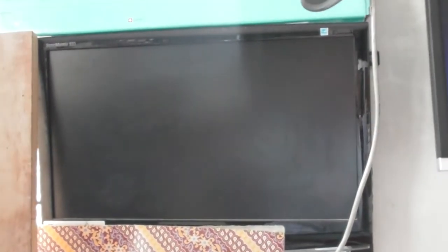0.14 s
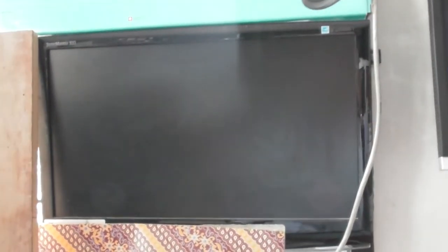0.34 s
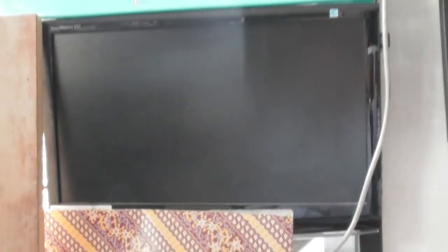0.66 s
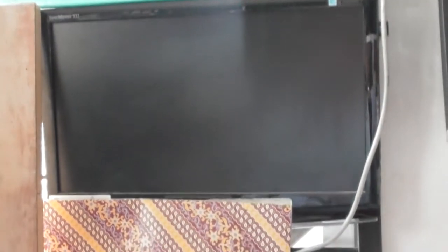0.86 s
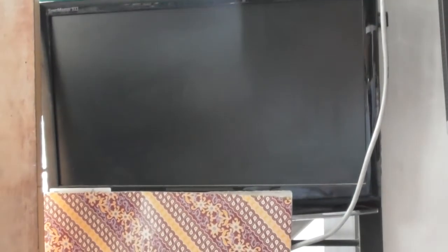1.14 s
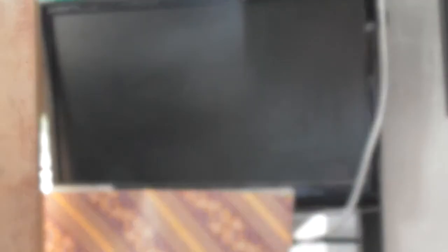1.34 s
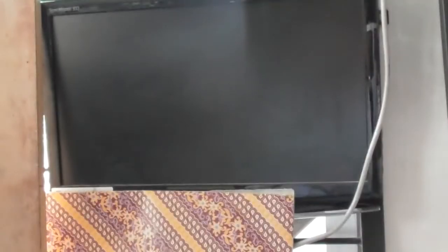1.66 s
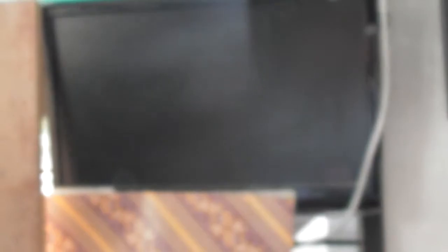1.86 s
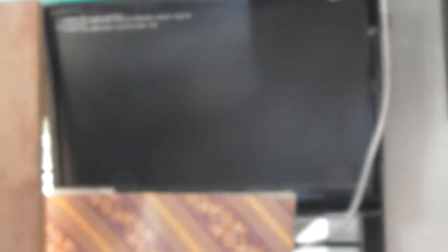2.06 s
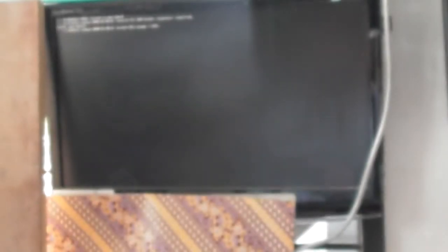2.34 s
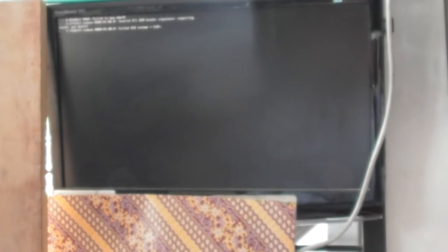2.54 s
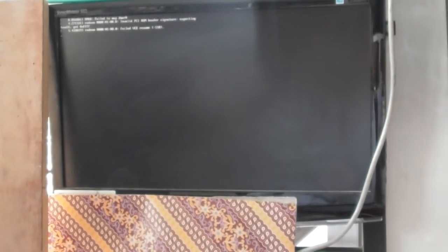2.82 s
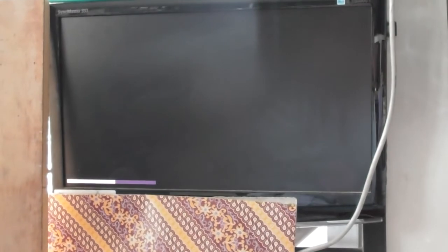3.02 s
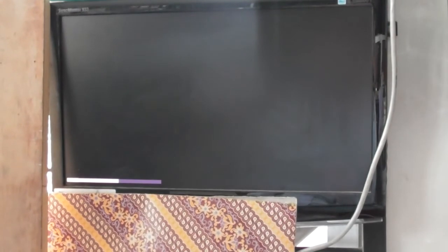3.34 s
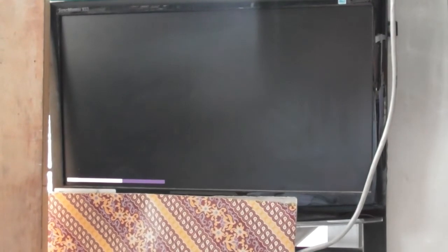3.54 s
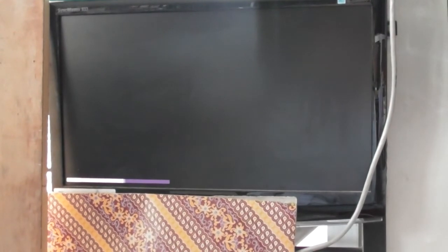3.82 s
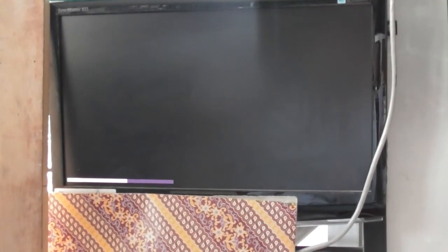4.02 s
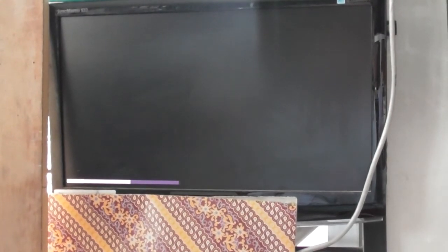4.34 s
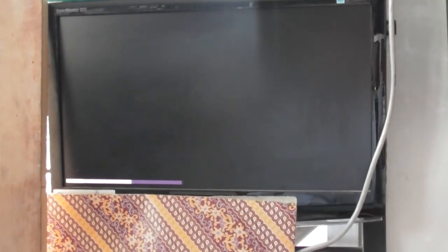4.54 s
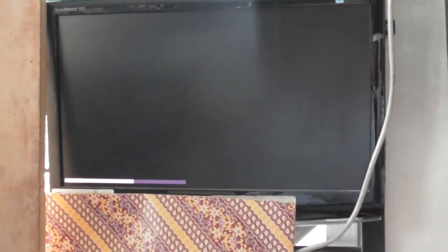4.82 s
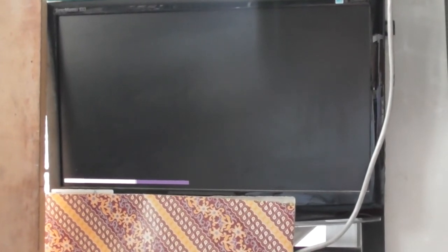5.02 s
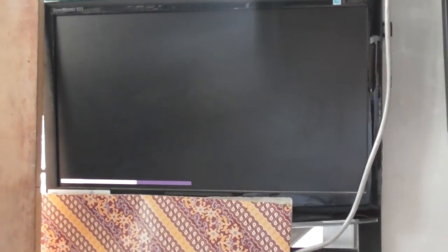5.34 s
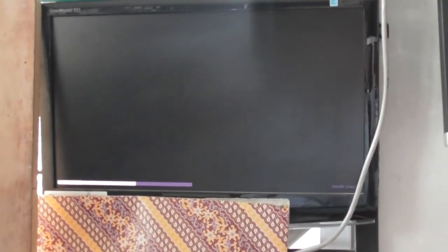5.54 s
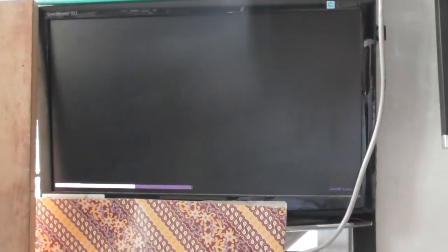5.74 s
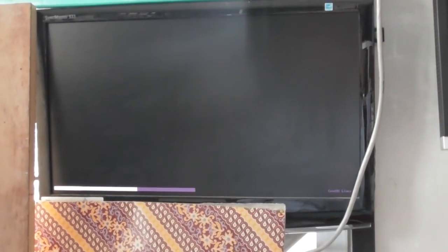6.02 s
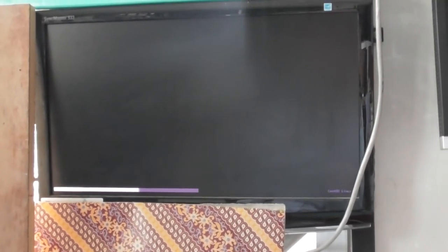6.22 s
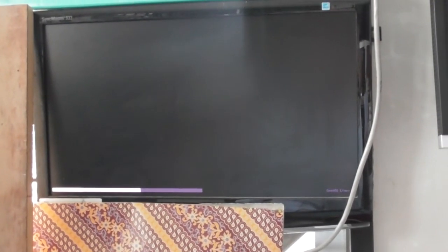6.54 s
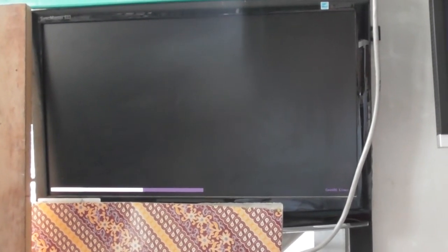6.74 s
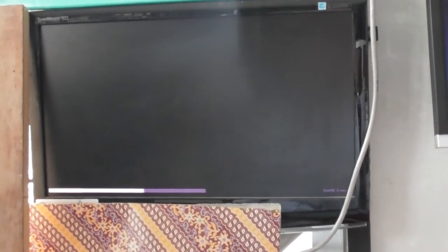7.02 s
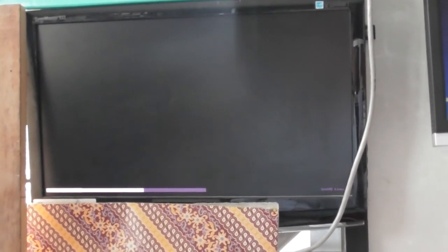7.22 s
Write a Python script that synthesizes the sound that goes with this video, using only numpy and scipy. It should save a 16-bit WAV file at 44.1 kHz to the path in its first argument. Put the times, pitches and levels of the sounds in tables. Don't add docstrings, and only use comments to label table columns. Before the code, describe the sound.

From 0 to about 7.4 seconds a desktop computer runs steadily in a small room: soft low rumble, a mid-range rush of fan air, a low hum near 107 hertz that dips now and then, and weaker blade and electrical tones. Outside, muffled by the wall, a small motorbike pulls away; its throaty buzz rises in pitch from 0 to about 2.4 seconds, swelling unevenly, then drops through a gear change until about 3.6. It pulls again more gently, fluttering with reflections around 4 to 5 seconds, recedes around 5 to 6.5, then returns as a brief deep swell near 7. Handling of the phone makes a barely audible tick at 0.15, a dry tick and dull knock near 5.0 and 5.1, a soft tick at 6.9, and a heavier close pair at 7.36. Faint microphone hiss lies underneath, slightly brighter near 0.4.

```python
import sys
import numpy as np
from scipy import signal
from scipy.fft import rfft, irfft, next_fast_len
from scipy.io import wavfile

SR = 44100
rng = np.random.default_rng(int(sys.argv[2]) if len(sys.argv) > 2 else 0)


def amplitude_ratio(level_db):
    exponent = np.asarray(level_db, float) / 20
    return 10 ** exponent


def transcribe(signal):
    frames = np.atleast_2d(signal).T
    limited = np.clip(frames, -1, 1)
    pcm = np.round(limited * 32767).astype(np.int16)
    wavfile.write(sys.argv[1], SR, pcm)


N = 325502


def fan_air(near_db):
    # (frequency [Hz], density [dB per Hz])
    rumble = [(20, -21), (40, -15.5), (53, -7.5), (64, -11.5), (90, -4.5), (115, -3), (140, -1), (180, -3),
              (225, -4), (260, -8.5), (290, -9), (400, -13), (520, -18), (700, -31)]
    rush = [(260, -16.5), (450, -5.5), (556, -2.5), (673, -0.5), (920, -6), (997, -5), (1140, -8),
            (1300, -8.5), (1460, -12.5), (3240, -17.5), (5000, -30), (6500, -69), (11000, -120)]
    low = air(rumble, -35 + 0.28 * near_db, flutter_db=0.93)
    high = air(rush, -44 + near_db, flutter_db=0.24)
    return low + high


def rotor_hum():
    # (time [s], depth [dB])
    rotor_nulls = [
        (.35, 0.5),
        (1.1, 4),
        (3.5, 3),
        (4.95, 6),
        (5.3, 7),
        (5.82, 4),
        (6.35, 9),
    ]
    null_length_s = 0.084
    level_db = -38.5 + 0.75 * drift(4.7)
    for s, depth_db in rotor_nulls:
        level_db = level_db - depth_db * bump(s, null_length_s)
    return tone(106.6, level_db, wander_hz=0.042, lean_db=1.4)


def blade_tones():
    # (time [s], level [dB])
    blade_path = [
        (0, -56),
        (.18, -47.5),
        (2.3, -50.5),
        (2.8, -53.5),
        (3.6, -53),
        (4.4, -50),
        (5.9, -49),
        (7.38, -57.5),
    ]
    # (frequency [Hz], level over the path [dB], pitch wander [Hz])
    blade_partials = [(342.3, -.5, .6), (674.6, -6.5, 1.2)]
    path_db, = in_time(blade_path)
    out = 0
    for hz, partial_db, wander_hz in blade_partials:
        level_db = path_db + partial_db + 1.8 * drift(5.1)
        out = out + tone(hz, level_db, wander_hz, lean_db=-1.0)
    return out


def steady_tones():
    # (frequency [Hz], rms level [dB], pitch wander [Hz], level wander [dB], left minus right [dB])
    steady_lines = [(99.9, -54, .05, 1, 0), (70.5, -55, .4, 2, 0), (994.5, -66, 4, 4, -1),
                    (1217, -68, 2, 3, -1), (1340, -69, 3, 4, -1), (2397, -77, 3, 3, 0),
                    (7246, -90, 4, 3, 0), (3531, -82, 2, 3, 0), (13404, -94, 1.5, 3, 0)]
    out = 0
    for hz, level_db, wander_hz, swing_db, lean_db in steady_lines:
        out = out + tone(hz, level_db + swing_db * drift(1.5), wander_hz, lean_db)
    return out


def motorbike():
    # (time [s], firing rate [1/s])
    speed = [(0, 42.7), (.56, 48.7), (1.12, 53.9), (1.54, 59.4), (1.82, 63.8), (2.1, 67.4), (2.36, 69.6),
             (2.6, 64.8), (2.94, 56.1), (3.1, 51.3), (3.36, 48.4), (3.64, 47.4), (4.2, 50.8), (4.76, 52.4),
             (5.88, 54.7), (6.72, 51.7), (7.0, 50.7), (7.38, 48.9)]
    # (time [s], exhaust level [dB], loss per higher order [dB])
    engine_load = [(0, -46, 0.1), (.15, -37.5, 0), (.45, -43.5, -2), (1.0, -32.5, 0.6), (1.4, -41, 1.5),
                   (1.6, -32.5, 2), (2.38, -32.5, 4), (2.55, -43, 4.5), (3.05, -35, 1.7), (3.6, -35.5, 0.3),
                   (4.06, -33.5, 0.5), (4.3, -37.5, 0.1), (4.8, -38, 2), (5.1, -43.5, -1.8), (6.5, -47, 5),
                   (6.8, -33.5, 8), (7.15, -30.5, 9), (7.38, -38, 13)]
    # (order [1], level [dB])
    exhaust = [(2, -12), (3, -0.56), (4, -0.45), (5, -12.5), (6, -11.5), (7, -14), (8, -17.5), (9, -9),
               (10, -12)]
    # (frequency [Hz], level [dB], lag between microphones [rad])
    wall = [(80, -15, .1), (133, -8.5, .08), (150, -1, .06), (166, -12.5, .1), (173, -1, 0.24),
            (211.4, -0.65, 0.16), (233, -7.5, .3), (264, -7, .4), (304, -3.5, 0.47), (353, 0.3, 0.31),
            (385, -7.5, 0.55), (554, -17.5, 1)]
    # (time [s], length [s], 3rd order [dB], 4th order [dB])
    echoes = [(.22, .2, -17, 2), (1.3, 0.13, -14, -0.5), (2.05, 0.12, 4, -1), (2.21, 0.041, -11, -2),
              (2.347, 0.12, 4.5, -10), (2.496, 0.057, -11, -3), (2.626, 0.053, 8, 0.1),
              (3.096, .07, 7, 0.1), (3.22, .05, -4, -7), (3.65, .12, -11, -1.5), (4.014, 0.11, -4, 4.5),
              (4.22, 0.064, -5, -6.5), (4.42, 0.069, 9.5, 2.5), (4.62, 0.056, -8, 4.3), (4.788, .06, 8, 4),
              (5.302, 0.057, 16, -14), (5.602, .06, 10, -1), (7.28, 0.18, -1.5, 7.5)]

    firings_per_s, = in_time(speed)
    load_db, loss_db = in_time(engine_load)
    turn = 2 * np.pi * np.cumsum(firings_per_s) / SR
    mode_hz, mode_db, mode_lag = np.transpose(wall)
    third_db = sum(third * bump(s, length) for s, length, third, _ in echoes)
    fourth_db = sum(fourth * bump(s, length) for s, length, _, fourth in echoes)
    echo_db = {3: third_db, 4: fourth_db}

    out = 0
    for order, order_db in exhaust:
        hz = order * firings_per_s
        level_db = load_db + order_db - loss_db * (order - 3)
        level_db = level_db + np.interp(hz, mode_hz, mode_db)
        level_db = level_db + echo_db.get(order, 0)
        level_db = level_db + 0.84 * drift(2.85) + 0.5 * drift(11)
        lag = np.array([[-.5], [.5]]) * np.interp(hz, mode_hz, mode_lag)
        wave = np.sin(order * turn + rng.uniform(0, 2 * np.pi) - lag)
        out = out + np.sqrt(2) * amplitude_ratio(level_db) * wave
    return out


def ticks():
    # (time [s], peak [dB], knock minus peak [dB], top minus peak [dB], left minus right [dB])
    hand_ticks = [
        (.15, -60, -12, 4, -2),
        (4.988, -47.5, -12, -1, 5),
        (5.1195, -56, 5, -14, -5),
        (6.886, -53, -2, -14, -3),
        (7.3628, -47, -10, -10, -2),
        (7.3648, -44, 3.5, -12, -6),
    ]
    # (frequency [Hz], level [dB], decay time t60 [s])
    main_modes = [(3900, -5, .004), (4650, -5, .004), (6300, -13, .003), (7600, 0, .004), (8700, -1, .005)]
    upper_modes = [(10200, 0, .003), (11300, -2, .003), (12300, -4, .003)]
    knock_modes = [(2250, 0, .006), (2800, -1, .005), (3400, -2, .005)]

    out = np.zeros((2, N))
    t = np.arange(600) / SR
    dull = signal.butter(6, 13000, fs=SR, output="sos")
    for s, peak_db, knock_db, top_db, lean_db in hand_ticks:
        length_s = .0038 + .0001 * knock_db
        envelope = np.sin(np.pi * np.clip(t / length_s, 0, 1))
        sparse = rng.random(len(t)) < .3
        slips = rng.standard_normal(len(t)) * sparse * envelope
        tick = shell(slips, main_modes)
        tick = tick + amplitude_ratio(top_db) * shell(slips, upper_modes)
        tick = tick + amplitude_ratio(knock_db) * shell(slips, knock_modes)
        at = round(s * SR)
        out[:, at:at + len(t)] += panned(amplitude_ratio(peak_db) * signal.sosfilt(dull, tick), lean_db)
    return out


def microphone_hiss(near_db):
    # (frequency [Hz], density [dB per Hz])
    hiss = [(2820, -17), (4800, -20), (5240, -10), (6300, -7), (7730, -3), (8800, -7), (10100, -13),
            (12500, -15), (15000, -15), (16400, -15)]
    surge_db = 2.5 * bump(0.39, 0.39)
    return air(hiss, -64 + 0.33 * near_db + surge_db, flutter_db=0.71)


def air(spectrum, level_db, flutter_db):
    # (frequency [Hz], width [Hz], level [dB])
    case_modes = [(52.4, 6, -3.5), (75.6, 22, 5), (92.7, 10.7, -6), (112, 6.5, -1.5), (125, 10, 5.5),
                  (131, 7.4, -3), (150.7, 6.3, 8), (199.9, 18, 4.5), (253, 19, 5), (278, 3.6, -2),
                  (433, 29, 3), (511, 6, 5.5), (612, 74, 3.5), (727, 36, 1.5), (796, 9.7, 4.5),
                  (816, 35, 2.5), (1030, 20, 1), (1110, 6.6, -10.5), (1262, 40, 3), (1460, 44, -4)]
    # (frequency [Hz], side minus mid [dB])
    side_spread = [(40, -13), (70, -25), (90, -29), (140, -26), (210, -13.5), (330, -13), (500, -11.5),
                   (1170, -9), (2740, -11.5), (4200, -15.5), (6400, -27), (8000, -15), (9800, 1),
                   (15000, -1)]
    # (frequency [Hz], left minus right [dB])
    balance = [(30, .7), (100, 1), (200, 0), (380, -1), (700, -.7), (1290, -1.6), (2380, -.7), (4400, 0),
               (8120, -.3), (15000, .4)]

    size = next_fast_len(N)
    hz = np.arange(size // 2 + 1) * SR / size
    inside = (hz > spectrum[0][0]) & (hz < spectrum[-1][0])
    colour_db = at_hz(spectrum, hz)
    for centre_hz, width_hz, db in case_modes:
        colour_db = colour_db + db / (1 + (2 * (hz - centre_hz) / width_hz) ** 2)
    mid, side = rfft(rng.standard_normal((2, size))) * amplitude_ratio(colour_db) * inside
    side = side * amplitude_ratio(at_hz(side_spread, hz))
    pair = panned(mid + side * [[1], [-1]], at_hz(balance, hz))
    both = irfft(pair, size)[:, :N]
    return both / both.mean(axis=0).std() * amplitude_ratio(level_db + flutter_db * drift(3.6))


def tone(hz, level_db, wander_hz, lean_db):
    turn = 2 * np.pi * np.cumsum(hz + wander_hz * drift(2.49)) / SR
    lag = np.array([[0], [.2]])
    return panned(np.sqrt(2) * amplitude_ratio(level_db) * np.sin(turn - lag), lean_db)


def shell(slips, modes):
    out = 0
    for hz, db, t60 in modes:
        x = ring(slips, hz, t60)
        out = out + amplitude_ratio(db) * x / np.abs(x).max()
    return out


def ring(clicks, hz, t60):
    r = amplitude_ratio(-60 / (t60 * SR))
    w = 2 * np.pi * hz / SR
    return signal.lfilter([0, np.sin(w)], [1, -2 * r * np.cos(w), r * r], clicks + 1e-18)


def panned(x, lean_db):
    return x * amplitude_ratio(np.array([[.5], [-.5]]) * lean_db)


def drift(rate):
    r = np.exp(-80 * np.pi * rate / SR)
    noise = rng.standard_normal(N // 40 + 2002)
    slow = signal.lfilter([1], [1, -2 * r, r * r], noise)[2000:]
    slow = (slow - slow.mean()) / slow.std()
    return np.interp(np.arange(N) / 40, np.arange(len(slow)), slow)


def bump(at, length):
    return np.exp(-((np.arange(N) / SR - at) / length) ** 2)


def in_time(rows):
    s, *columns = np.transpose(rows)
    return [np.interp(np.arange(N) / SR, s, c) for c in columns]


def at_hz(points, hz):
    point_hz, point_db = np.array(points).T
    return np.interp(np.log(np.maximum(hz, 1)), np.log(point_hz), point_db)


def scene():
    # (time [s], level [dB])
    nearness = [
        (0, -1.1),
        (.3, 0.1),
        (1.0, 0.2),
        (2.0, 0.54),
        (3.2, 0.35),
        (4.6, 0.55),
        (5.0, -0.4),
        (5.7, -0.95),
        (6.5, -.6),
        (7.38, -0.2),
    ]
    near_db, = in_time(nearness)
    computer = fan_air(near_db) + rotor_hum() + blade_tones() + steady_tones()
    return computer + motorbike() + ticks() + microphone_hiss(near_db)


def low_pass(x):
    return signal.sosfilt(signal.butter(12, 15720, fs=SR, output="sos"), x)


def record(dry):
    cut = signal.cheby2(14, 50, 16300, fs=SR, output="sos")
    return low_pass(signal.sosfilt(cut, dry))


dry = scene()
out = record(dry)
transcribe(out)
```